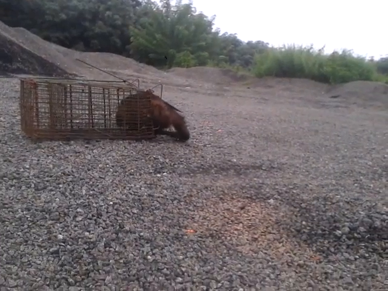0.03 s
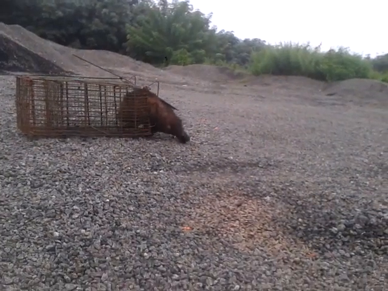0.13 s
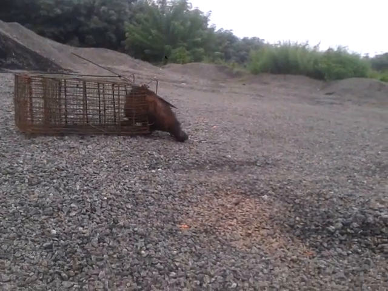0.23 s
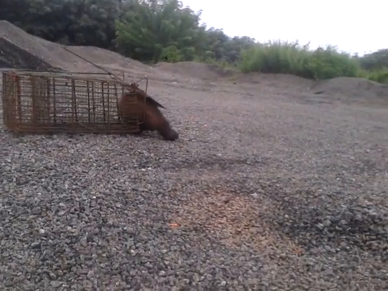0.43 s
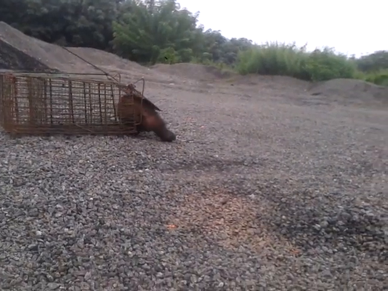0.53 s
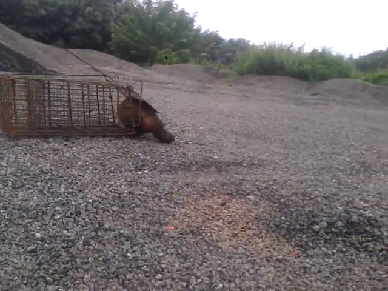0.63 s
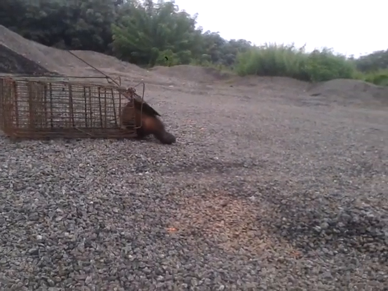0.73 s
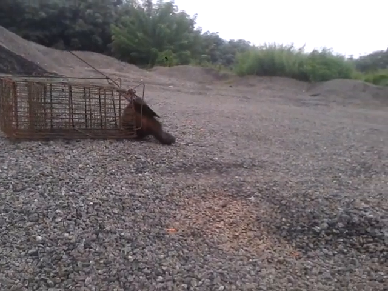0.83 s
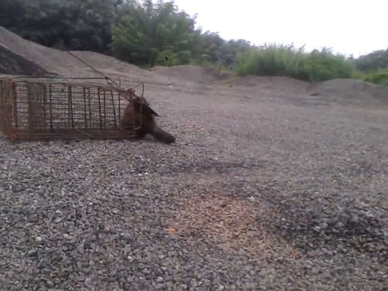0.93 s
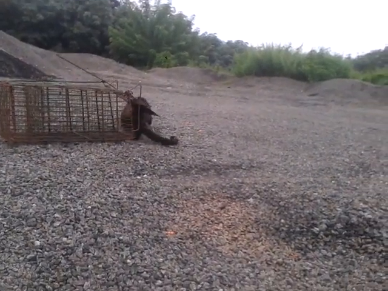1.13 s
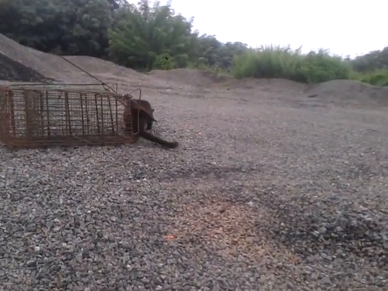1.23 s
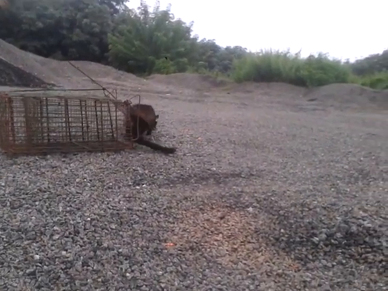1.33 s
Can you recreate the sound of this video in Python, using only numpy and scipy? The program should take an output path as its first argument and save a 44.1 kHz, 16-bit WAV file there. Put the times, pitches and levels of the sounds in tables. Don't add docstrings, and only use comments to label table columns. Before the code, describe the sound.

A distant bird calls twice, each a nasal, fast-trilled cry that leaps up and slides down, while an animal leaving a wire cage knocks stones and wire; open gravel yard, faint echo, hissy small microphone.

```python
import sys
import numpy as np
from scipy import signal
from scipy.fft import rfft, irfft
from scipy.io import wavfile
from scipy.ndimage import uniform_filter1d

SR = 44100
rng = np.random.default_rng(int(sys.argv[2]) if len(sys.argv) > 2 else 0)


def to_wav(s):
    ch = np.atleast_2d(s).T
    pcm = np.round(np.clip(ch, -1, 1) * 32767)
    wavfile.write(sys.argv[1], SR, pcm.astype(np.int16))


def invert_db(x):
    u = np.asarray(x, float) / 20
    return 10 ** u


N = 61739

# (frequency [Hz], level per Hz [dB])
HISS_COLOUR = [(25, -29), (250, -8.5), (414, -3.5), (690, -13), (2600, -17), (4000, -15), (6000, -19.5),
               (15500, -24.5)]
# (centre [Hz], width [Hz], level [dB])
HUMS_AND_INSECTS = [
    (418.2, 39.5, -66),
    (320, 42, -75.5),
    (562, 173, -70.5),
    (3055, 340, -70),
    (5100, 540, -68),
    (14260, 4400, -71.5),
]
# (time [s], level [dB])
BREEZE_LEVEL = [(0, -3), (.1, -0.9), (.3, 1.06), (.6, -0.2), (.9, 0.95), (1.15, 0.25), (1.25, -1.14),
                (1.4, -1)]
# (start [s], length [s], stone ticks [dB], scrape [dB])
FOOT_SCUFFS = [
    (0.727, 0.18, -59.5, -63.5),
    (1.272, 0.027, -65, -61.5),
    (1.4, 0.022, -46, -75),
]
# (time [s], thud level [dB], thud pitch [Hz], tick level [dB], tick pitch [Hz])
FOOT_KNOCKS = [(.1002, -44, 1820, -53, 3130), (.1008, -42.5, 980, -50, 4000),
               (.1603, -43, 1530, -43.5, 2300), (.161, -52, 800, -68, 3500),
               (0.1818, -45.5, 3200, -66, 3600), (.2685, -48, 1010, -39.5, 4310),
               (.3235, -74, 1020, -49, 4540), (.438, -50, 1210, -43, 5130), (0.4892, -30, 870, -34.5, 2374),
               (.4886, -46, 3650, -40, 4600), (0.489, -41.5, 570, -40, 1150),
               (.5745, -46, 3820, -46.5, 5570), (.722, -54, 1280, -53, 4200), (.855, -49, 800, -44, 2620),
               (.859, -46, 1000, -48, 3310), (.9625, -40.5, 1000, -45.5, 3500),
               (1.143, -52, 1360, -50.5, 3720), (1.243, -71, 1520, -64, 4500),
               (1.2845, -104, 1492, -48, 3170)]
FIRST_CALL = [
    (.2, 551.3, -58, 20, -0.1),
    (.228, 698.5, -54.5, 64, -0.06),
    (0.252, 755.8, -40, 109, 0.56),
    (0.288, 713.6, -34.5, 59, 0.04),
    (0.341, 693.7, -37.5, 30.7, 0.04),
    (0.399, 648, -42.5, 52, -0.1),
    (0.443, 624, -47.5, 77, -.7),
    (.471, 489, -41, 3.1, 0.4),
    (0.491, 465, -51, 4.5, -0.3),
]
SECOND_CALL = [
    (0.856, 489.6, -49, 20, 0.4),
    (.884, 663.8, -54.5, 100, -0.4),
    (.908, 761, -40, 125, 0.4),
    (0.953, 700.4, -34.5, 55, -0.13),
    (0.998, 683, -37.5, 31.6, 0.12),
    (1.055, 647.7, -43, 49, -0.44),
    (1.106, 599.5, -49.5, 36.4, -0.16),
    (1.129, 528, -43, 8.5, -0.3),
    (1.155, 501, -53.5, 5, 0.1),
]
WARBLE_TOPS = [.3142, 1]
HARMONIC_LEVELS = [-34, 0, -2.5]


def evened(x):
    return x / np.sqrt(np.mean(x ** 2) + 1e-20)


def add(mix, s, sound):
    part = mix[round(s * SR):][:len(sound)]
    part += sound[:len(part)]


def resonate(x, hz, width):
    turn = np.exp(2j * np.pi * hz * np.arange(len(x)) / SR)
    r = np.exp(-np.pi * abs(width) / SR)
    return 2 * (turn * signal.lfilter([1 - r], [1, -r], x / turn)).real


def wander(seconds):
    size = max(int(seconds * SR), 1)
    smooth = uniform_filter1d(rng.standard_normal(N), size)
    return evened(uniform_filter1d(smooth, size))


def ring(hz, t60):
    t = np.arange(1500) / SR
    return invert_db(-60 * t / t60) * np.sin(2 * np.pi * hz * t)


def air():
    hiss_db, swell_db, patchy_db, flutter_db = -56.5, 0.4, 1.2, 1.6
    frames, hz = N // 256 + 5, np.fft.rfftfreq(1024, 1 / SR)
    a, b, patches = rng.standard_normal((frames, 513, 3)).T
    patches = uniform_filter1d(patches, 10, 0)
    patches = evened(uniform_filter1d(patches, 12, 1))
    f, db = np.transpose(HISS_COLOUR)
    colour = np.interp(np.log(hz + 1), np.log(f + 1), db)[:, None]
    z = (a + 1j * b) * invert_db(colour + patchy_db * patches)
    hiss = evened(signal.istft(z, nperseg=1024, noverlap=768)[1][:N])
    out = invert_db(hiss_db - 3.5 + swell_db * wander(0.13)) * hiss
    for centre, width, level in HUMS_AND_INSECTS:
        band = resonate(resonate(rng.standard_normal(N), centre, width), centre, width)
        out += invert_db(level + flutter_db * wander(0.032)) * evened(band)
    return out


def gravel():
    grit_per_s, grit_db, scuff_per_s = 92, -68, 1100
    t, draw, out = np.arange(N) / SR, rng.random(N), np.zeros(N)
    size = invert_db(grit_db) * (draw < grit_per_s / SR)
    scrape = resonate(rng.standard_normal(N), 3300, 3330)
    scrape = evened(scrape - uniform_filter1d(scrape, size=50))
    scrape = scrape * invert_db(3.2 * wander(0.002))
    for s, length, ticks_db, scrape_db in FOOT_SCUFFS:
        stroke = np.sin(np.pi * np.clip((t - s) / length, 0, 1) ** 1.4)
        size = size + invert_db(ticks_db) * stroke * (draw > 1 - scuff_per_s / SR)
        out += invert_db(scrape_db) * stroke * scrape
    size = size * invert_db(3.5 * np.minimum(rng.exponential(1, N), 3))
    stone = rng.integers(0, 12, N)
    for k, hz in enumerate(np.geomspace(1500, 9000, 12)):
        out += signal.oaconvolve(size * (stone == k), ring(hz, 9 / hz))[:N]
    return out


def knocks():
    thud_t60_s, tick_t60_s, snap_t60_s, snap_db = 0.01, 0.0068, 0.0064, 2.5
    bounce_s, bounce_db = 0.0053, -20
    low_hz, top_hz = 384, 6380
    out, t = np.zeros(N), np.arange(1500) / SR
    for s, thud_db, thud_hz, tick_db, tick_hz in FOOT_KNOCKS:
        snap = rng.standard_normal(1500) * invert_db(snap_db - 60 * t / snap_t60_s)
        tick = ring(tick_hz, tick_t60_s) + resonate(snap, tick_hz, 3000)
        thud = ring(thud_hz, thud_t60_s) + resonate(snap, thud_hz + 700, 1430)
        hit = invert_db(thud_db) * thud + invert_db(tick_db) * tick
        add(out, s, hit)
        add(out, s + bounce_s, invert_db(bounce_db) * hit)
    return signal.sosfilt(signal.butter(3, [low_hz, top_hz], "band", fs=SR, output="sos"), out)


def call(rows, top_s):
    jitter_hz, rasp_db, fade_s = 2.5, -20, 0.0064
    beak_hz, beak_width_hz, beak_top_hz = 1402, 340, 2140
    s, *cols = np.transpose(rows)
    t = np.arange(N) / SR
    hz, db, swing, lean = (uniform_filter1d(np.interp(t, s, c), 300) for c in cols)
    hz = hz + jitter_hz * wander(0.0041)

    rate = np.minimum(94.3 - 0.081 * (swing - 48), 0.1435 * hz)
    beat = 2 * np.pi * np.cumsum(rate) / SR
    beat = beat - np.interp(top_s, t, beat)
    shape = np.cos(beat) - 0.1 * np.cos(2 * beat - 0.12)
    turns = 2 * np.pi * np.cumsum(hz + swing * shape) / SR
    trough = np.clip(swing / 40, 0, 1)
    third_hz = 3 * hz - trough * rate + 0.96 * swing * shape
    third_turns = 2 * np.pi * np.cumsum(third_hz) / SR

    depth = np.minimum(0.66 + 0.009 * np.maximum(swing - 55, 0), 0.95)
    dip = depth * trough * np.sin((beat - 0.42) / 2) ** 14
    throb = (1 + lean * np.cos(beat - 0.41)) * (1 - dip)

    first, second, third = invert_db(np.array(HARMONIC_LEVELS))
    second = second * invert_db(-0.15 * np.maximum(585 - hz, 0))
    tone = throb * (first * np.cos(turns) + second * np.cos(2 * turns))
    swell = invert_db(-0.3 * np.maximum(hz - 625, 0)) * (1 + trough * np.cos(beat - 2.54))
    tone = tone + (t > s[2]) * third * swell * np.cos(third_turns)

    edge = np.clip(np.minimum(t - s[0], s[-1] - t) / fade_s, 0, 1)
    rasp = 1 + invert_db(rasp_db) * wander(0.001)
    voice = np.sqrt(2) * edge * invert_db(db) * tone * rasp
    beak = resonate(voice, beak_hz, beak_width_hz)
    return signal.sosfilt(signal.butter(5, beak_top_hz, fs=SR, output="sos"), beak)


def slopes(x):
    echo_db, echo_t60_s, gap_s = -17, 1.01, 0.008
    t = np.arange(SR) / SR
    taps = rng.standard_normal(SR) * (rng.random(SR) < 0.05)
    taps = taps * invert_db(-60 * t / echo_t60_s) * (t > gap_s)
    return invert_db(echo_db) * signal.fftconvolve(x, taps / np.linalg.norm(taps))[:N]


def scene():
    breeze = invert_db(np.interp(np.arange(N) / SR, *np.transpose(BREEZE_LEVEL)))
    background = breeze * air()
    feet = gravel() + knocks()
    bird = call(FIRST_CALL, WARBLE_TOPS[0]) + call(SECOND_CALL, WARBLE_TOPS[1])
    return (background + feet + bird + slopes(bird))[None]


def top_cut(x):
    return signal.sosfilt(signal.butter(12, 16330, fs=SR, output="sos"), x)


def record(dry):
    top_hz = 15740
    spectrum = rfft(dry, axis=1) * (np.fft.rfftfreq(N, 1 / SR) < top_hz)
    mix = irfft(spectrum, N, axis=1)
    return top_cut(mix)


dry = scene()
out = record(dry)
to_wav(out)
```